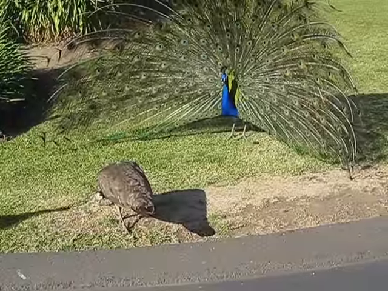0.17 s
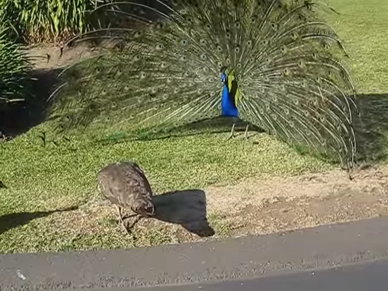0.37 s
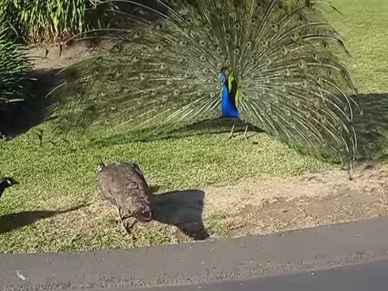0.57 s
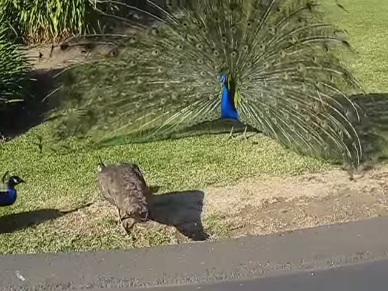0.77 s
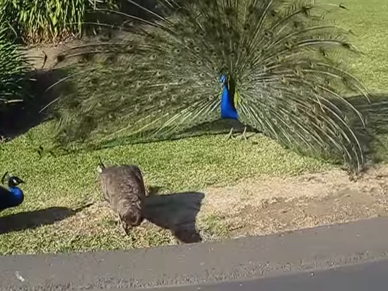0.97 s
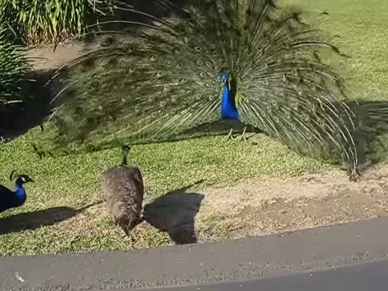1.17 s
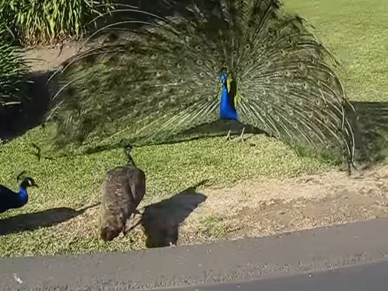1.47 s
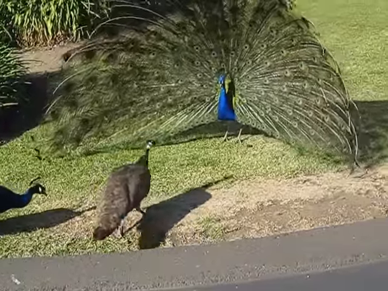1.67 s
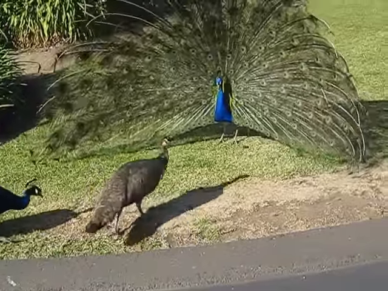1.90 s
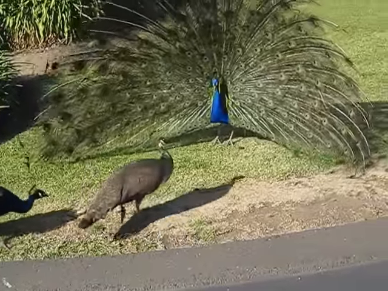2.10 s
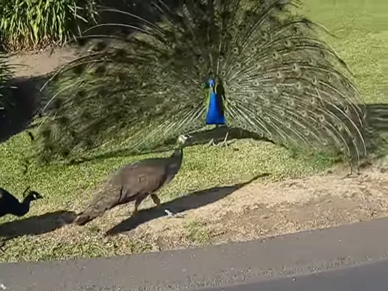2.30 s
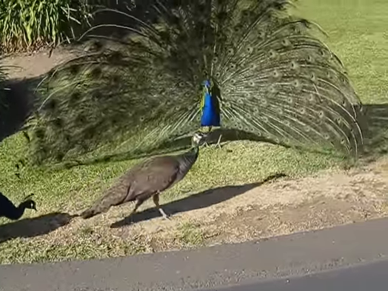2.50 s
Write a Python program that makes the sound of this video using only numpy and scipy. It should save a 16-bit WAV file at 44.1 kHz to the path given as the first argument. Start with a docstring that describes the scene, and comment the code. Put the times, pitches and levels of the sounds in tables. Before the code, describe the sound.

A peacock shivers its raised tail feathers in a dry, rattling rustle that swells, sinks away and swells again. A small bird peeps nearby in quick trilled pairs, over the steady murmur of a park and a faint low hum.

```python
"""From the start, the steady murmur of an open park and a low machine hum lie behind a small bird
that peeps nearby in quick trilled pairs. A peacock on the lawn shivers his raised train: the quills
swing about 25 times a second and thousands of barbs tick and brush together. The rattle swells
towards the one-second mark, sinks away, and swells again at about two seconds."""
import sys
import numpy as np
from scipy import signal
from scipy.fft import rfft, irfft, next_fast_len
from scipy.io import wavfile
from scipy.ndimage import uniform_filter1d

SR = 44100
rng = np.random.default_rng(int(sys.argv[2]) if len(sys.argv) > 2 else 0)


def waveform_to_disk(signal):
    """Save audio, clipped to [-1, 1], as 16-bit WAV at the path in sys.argv[1]."""
    frames = np.transpose(np.atleast_2d(signal))
    scaled = np.clip(frames, -1, 1) * 32767
    samples = np.round(scaled).astype(np.int16)
    wavfile.write(sys.argv[1], SR, samples)


N = 116865
T = np.arange(N) / SR


def undb(db):
    """Amplitude grows tenfold for every 20 decibels."""
    return 10 ** (np.asarray(db) / 20)


def unit(x):
    """Division by the rms value gives a signal unit power."""
    return x / np.sqrt(np.mean(x ** 2))


def walk(rate):
    """Averaging random steps, `rate` of them a second, gives a smooth wander of rms 1."""
    hold = int(SR / rate)
    steps = np.repeat(rng.standard_normal(N // hold + 1), hold)
    return unit(uniform_filter1d(uniform_filter1d(steps, hold), hold)[:N])


def colour(x, points):
    """A minimum-phase filter imposes a spectrum of (Hz, dB) points and rings only after its input."""
    hz, db = np.array(points).T
    size = next_fast_len(N + 8192)
    freqs = np.maximum(np.fft.rfftfreq(size, 1 / SR), 1)
    gain = undb(np.interp(np.log(freqs), np.log(hz), db))
    cepstrum = irfft(np.log(gain), size)
    cepstrum[1:size // 2] *= 2  # folding onto positive time makes the filter causal
    cepstrum[size // 2 + 1:] = 0
    return irfft(rfft(x, size) * np.exp(rfft(cepstrum, size)), size)[:N]


def band(x, hz, half_width_hz):
    """A pair of resonances passes the frequencies around hz."""
    edges = [hz - half_width_hz, hz + half_width_hz]
    return signal.sosfilt(signal.butter(2, edges, "band", fs=SR, output="sos"), x)


def shelf(x, hz, db):
    """A zero-phase shelving filter changes the treble above hz by db."""
    treble = signal.sosfiltfilt(signal.butter(1, hz, "high", fs=SR, output="sos"), x)
    return x + treble * (undb(db) - 1)


def park_murmur():
    """Distant outdoor sounds merge into broadband noise, strongest at low frequencies."""
    # Each row: frequency in Hz, relative spectral density in dB.
    spectrum = [(20, -17), (42, -2), (52, -5), (80, 5), (105, 0), (160, -2), (300, -5.5), (480, -5.5),
                (700, -2), (900, 2), (1150, -1.5), (1600, -6.5), (2400, -8.5), (4000, -16), (8000, -22),
                (15800, -31)]
    noise = unit(colour(rng.standard_normal(N), spectrum))
    return noise * undb(-38 + 0.33 * walk(7.8))


def machine_hum():
    """A machine radiates one low tone, slightly modulated in frequency and amplitude."""
    pitch_hz = 120.1 + 1.4 * walk(8)
    tone = unit(np.sin(2 * np.pi * np.cumsum(pitch_hz) / SR))
    return tone * undb(-46 + 2 * walk(8.8))


def shrub_echo(x):
    """Scattering from many leaves gives a faint diffuse echo that builds, then decays exponentially."""
    rise_s, t60_s, echo_db = 0.017, 0.62, -9
    tail = rng.standard_normal(N) * np.exp(-np.log(1000) * T / t60_s)
    tail *= np.minimum(T / rise_s, 1) ** 2
    echo = band(signal.fftconvolve(x, tail)[:N], hz=2440, half_width_hz=230)
    return unit(echo) * np.std(x) * undb(echo_db)


def small_bird():
    """Each syllable is a frequency-modulated whistle: it swells as it falls and turns up as it fades."""
    # Each row: centre in seconds, length in seconds, lowest pitch in Hz, level in dB.
    syllables = [(.003, .010, 2330, -23.5), (0.023, .022, 2173, -26), (.054, .023, 2100, -21),
                 (0.075, .022, 2140, -21), (0.162, .020, 2137, -21), (0.173, 0.0054, 2630, -32),
                 (.184, .017, 2175, -19.5), (0.191, .006, 2680, -31), (0.196, .016, 2297, -29),
                 (0.23, .020, 2120, -18.5), (0.246, .014, 2078, -18), (0.341, .022, 2086, -20),
                 (0.362, .019, 2168, -18), (.377, .019, 2273, -23.5), (0.414, .016, 2117, -19),
                 (.435, .016, 2126, -20.5), (0.443, .014, 2630, -27), (0.542, .016, 2290, -23),
                 (0.559, .008, 2320, -20.5), (.610, .020, 2125, -19.5), (.628, .017, 2200, -18.5),
                 (0.648, .016, 2310, -29), (.735, .018, 2146, -21), (.754, .018, 2290, -22.5),
                 (0.781, .014, 2280, -23), (0.809, .018, 2030, -18.5), (0.827, .017, 2103, -18),
                 (.941, .016, 2100, -23), (0.955, .019, 2140, -21.5), (0.978, .010, 2220, -22),
                 (1.022, .018, 2152, -24), (1.044, .016, 2150, -20.5), (1.167, .019, 2144, -22.5),
                 (1.184, .017, 2196, -20.5), (1.202, .016, 2260, -25), (1.24, .021, 2066, -22),
                 (1.262, .010, 2225, -20.5), (1.271, .016, 2610, -28), (1.362, .019, 2140, -22.5),
                 (1.384, .018, 2286, -22), (1.403, .016, 2364, -26), (1.443, .022, 2060, -20.5),
                 (1.463, .007, 2285, -20.5), (2.058, .016, 2100, -26), (2.076, .013, 2224, -22),
                 (2.127, .018, 2015, -18.5), (2.146, .016, 2120, -18.5), (2.161, .010, 2450, -24),
                 (2.243, .015, 2200, -24.5), (2.263, .014, 2240, -21.5), (2.275, .014, 2500, -24),
                 (2.29, .017, 2405, -22), (2.319, .025, 2070, -19), (2.335, .020, 2173, -18.5),
                 (2.504, .020, 2160, -21.5), (2.529, .018, 2296, -24.5), (2.548, .014, 2283, -26),
                 (2.598, .016, 2200, -23), (2.617, .016, 2130, -20.5), (2.633, .016, 2236, -19.5)]
    fall_hz, turn_fraction = 252, 0.51
    waver_hz = 32.6 * walk(400)
    roughness = 1 + 0.16 * walk(500)
    peeps = np.zeros(N)
    for centre, length, lowest_hz, db in syllables:
        place = (T - centre) / length + .5
        on = (place > 0) & (place < 1)
        progress = place[on]
        pitch_hz = lowest_hz + fall_hz * (1 - progress / turn_fraction) ** 2 + waver_hz[on]
        envelope = undb(db) * np.sin(np.pi * progress) ** 0.68
        peeps[on] += envelope * np.sin(2 * np.pi * np.cumsum(pitch_hz) / SR)
    return peeps * roughness


def quill_knocks(strokes, effort_db):
    """Random impacts excite a resonance of the hollow shafts, louder with harder shaking."""
    knocks_per_s, full_effort_db = 350, -38.5
    knocks = rng.standard_normal(N) * (rng.random(N) < knocks_per_s / SR)
    ringing = unit(band(knocks * strokes, hz=908, half_width_hz=131))
    return ringing * undb(full_effort_db + 1.26 * effort_db)


def barb_rustle(strokes, effort_db):
    """Impact and friction between barbs sum to a dense noise, brighter with harder shaking."""
    # Each row: frequency in Hz, relative spectral density in dB.
    spectrum = [(150, -21.5), (420, -17), (590, -13.5), (740, -3), (950, 1), (1200, -7.5), (1600, -3),
                (1850, -5.5), (2150, -7.5), (2550, -4.5), (2900, 0), (3300, -6.5), (3750, -3.5),
                (4350, -8.5), (4700, -7.5), (5000, -12), (5350, -6.5), (7000, -13.5), (9300, -13.5),
                (12000, -21), (15800, -26)]
    # Each row: time in seconds, treble gain at full effort in dB.
    sheen = [(0, -1), (.4, 1), (1.1, 3), (1.5, -2), (1.8, 1.5), (2.2, -1), (2.65, -1)]
    ticks_per_s, spread_db, tick_db, brush_db = 4500, 1.5, -3, -4.5
    sizes = undb(spread_db * np.minimum(rng.exponential(size=N), 5)) * rng.choice([-1, 1], N)
    ticks = unit(sizes * (rng.random(N) < ticks_per_s / SR))
    contact = undb(tick_db) * ticks + undb(brush_db) * rng.standard_normal(N)
    clumps = walk(420)  # barbs catch and let go in little clumps
    rustle = unit(colour(contact * strokes * undb(0.73 * clumps), spectrum))
    rustle = shelf(rustle, hz=9100, db=1.03 * clumps)  # clumps are crispest in the highest treble
    sheen_db = np.interp(T, *np.array(sheen).T) + 0.08 * effort_db
    return shelf(rustle, hz=6000, db=sheen_db)


def peacock_train():
    """Forced vibration of the train modulates the amplitude of barbs and quills, two strokes a swing."""
    # Each row: time in seconds, level of the shaking in dB.
    shiver = [(0, -35.5), (.2, -44.5), (.42, -42), (.495, -37), (.52, -32.5), (.6, -28.5), (.74, -23.5),
              (.98, -23), (1.135, -27.5), (1.185, -33), (1.38, -31.5), (1.44, -35.5), (1.55, -38.5),
              (1.72, -42.5), (1.8, -31.5), (1.96, -25.5), (2.14, -23), (2.3, -30), (2.37, -33), (2.48, -29),
              (2.65, -28)]
    swing_hz, stroke_depth, swing_depth, full_level_db = 25.34, 0.07, 0.063, -23.5
    level_db = np.interp(T, *np.array(shiver).T)
    effort_db = level_db - full_level_db  # 0 at full effort
    phase = 2 * np.pi * np.cumsum(swing_hz * (1 + 0.014 * walk(2.96))) / SR
    strokes = 1 + stroke_depth * np.cos(2 * phase) + swing_depth * np.cos(phase)
    return barb_rustle(strokes, effort_db) * undb(level_db) + quill_knocks(strokes, effort_db)


def scene():
    """The pressures of all sources add by superposition at one microphone."""
    peeps = small_bird()
    return (peacock_train() + peeps + shrub_echo(peeps) + park_murmur() + machine_hum())[None]


def record(dry):
    """A steep low-pass filter limits the bandwidth."""
    cutoff_hz = 15750
    return signal.sosfilt(signal.ellip(10, .2, 80, cutoff_hz, fs=SR, output="sos"), dry)


dry = scene()
out = record(dry)
waveform_to_disk(out)
```